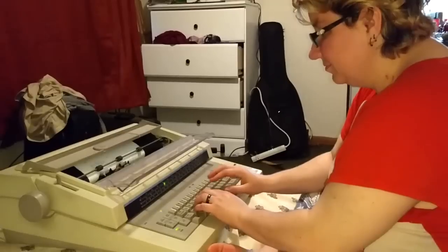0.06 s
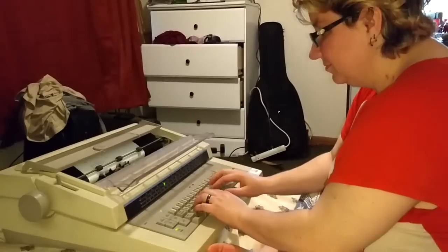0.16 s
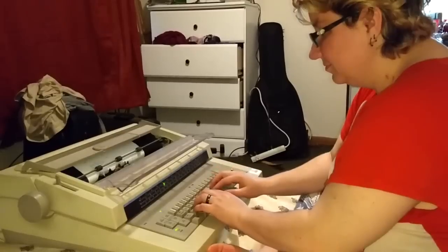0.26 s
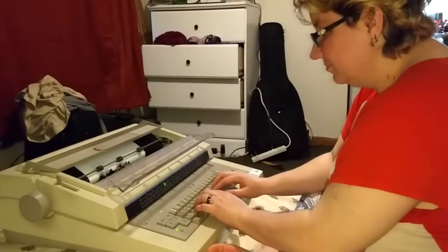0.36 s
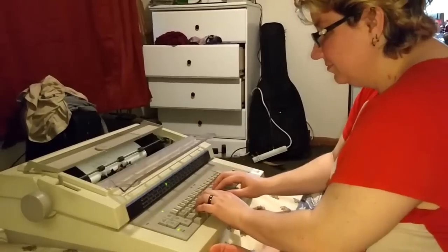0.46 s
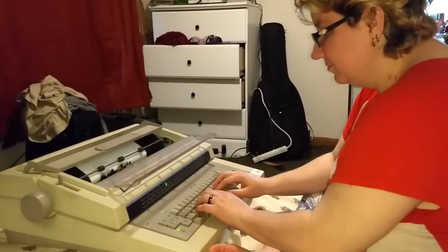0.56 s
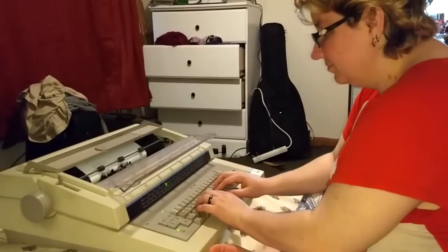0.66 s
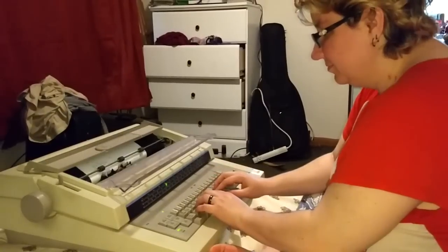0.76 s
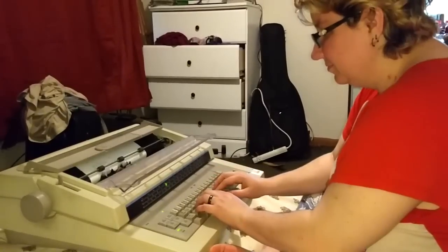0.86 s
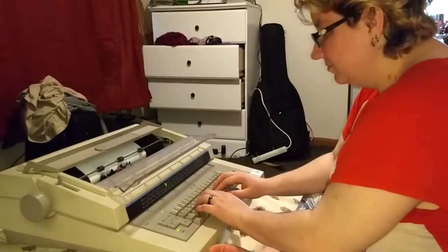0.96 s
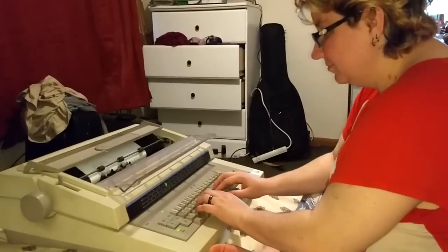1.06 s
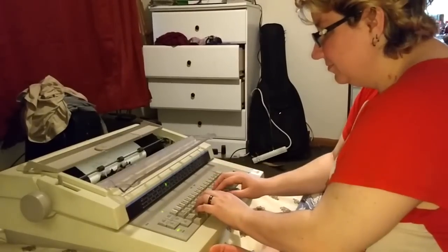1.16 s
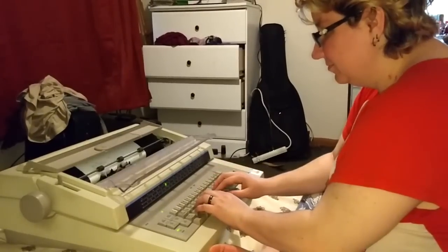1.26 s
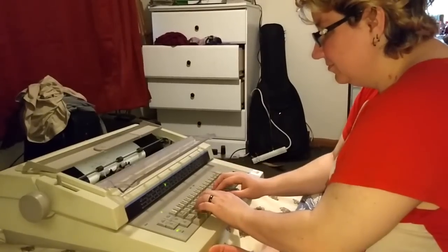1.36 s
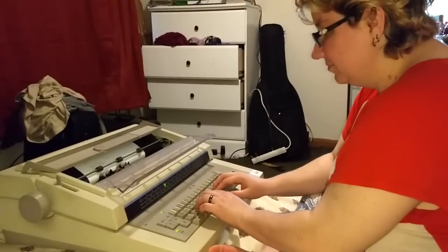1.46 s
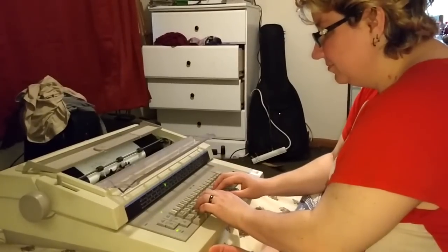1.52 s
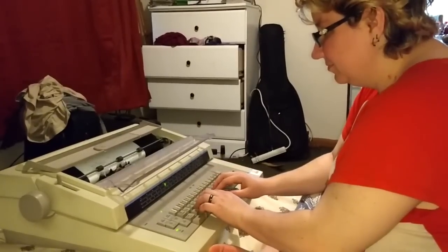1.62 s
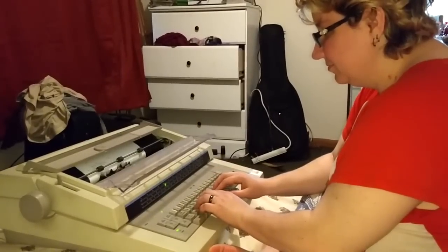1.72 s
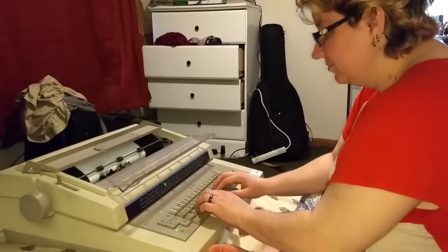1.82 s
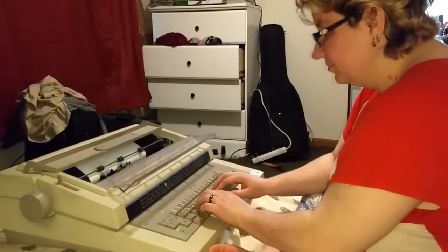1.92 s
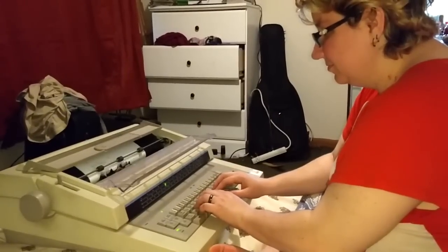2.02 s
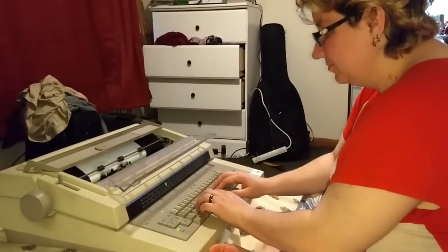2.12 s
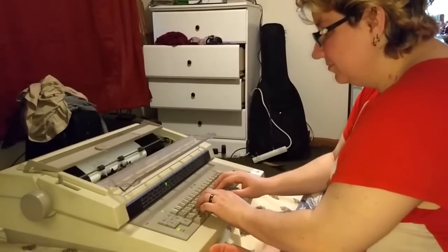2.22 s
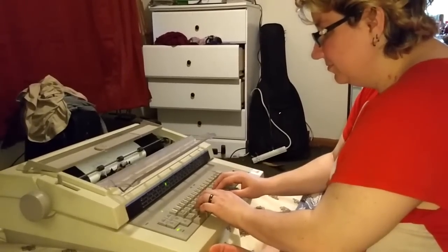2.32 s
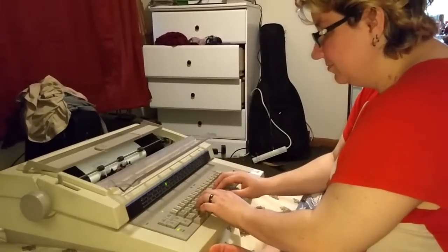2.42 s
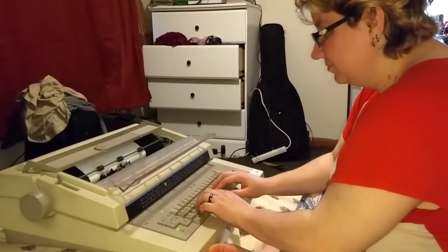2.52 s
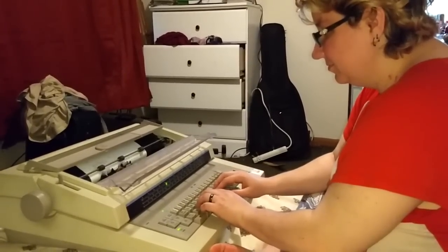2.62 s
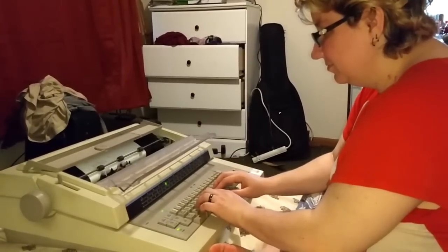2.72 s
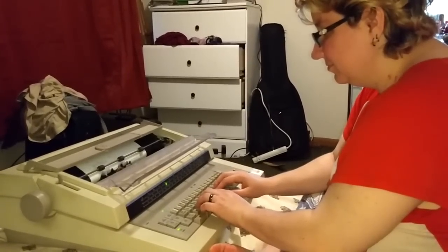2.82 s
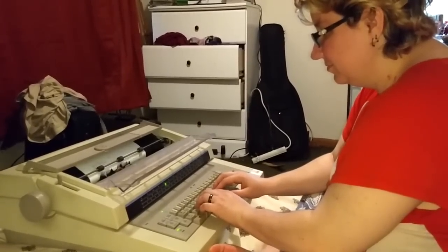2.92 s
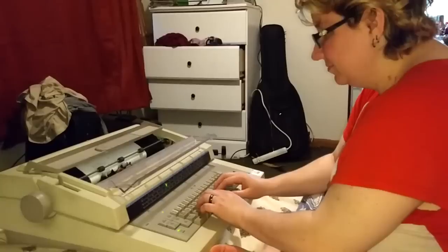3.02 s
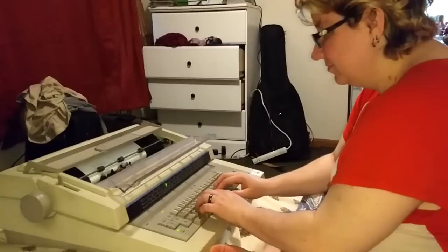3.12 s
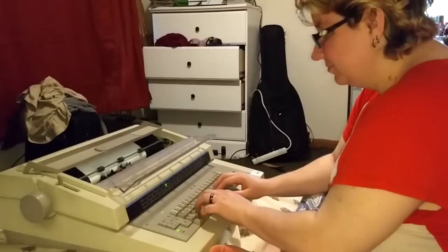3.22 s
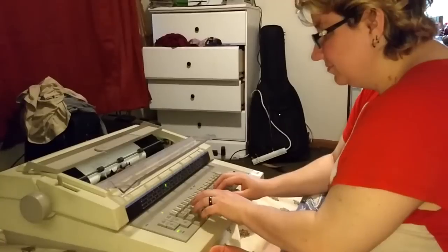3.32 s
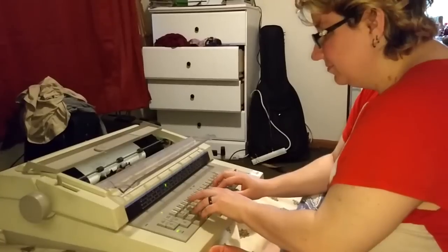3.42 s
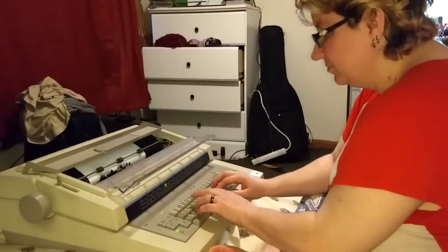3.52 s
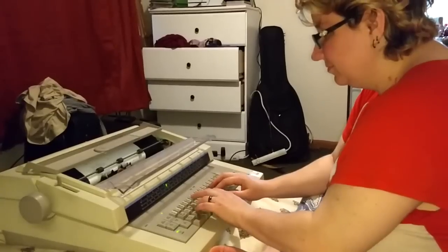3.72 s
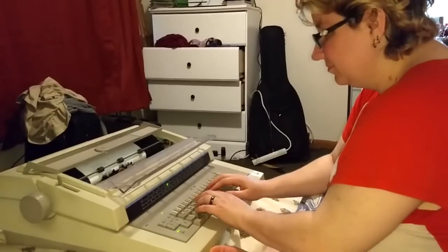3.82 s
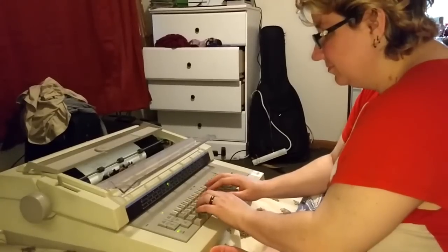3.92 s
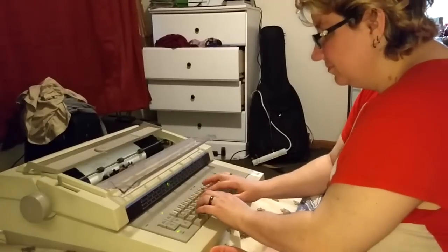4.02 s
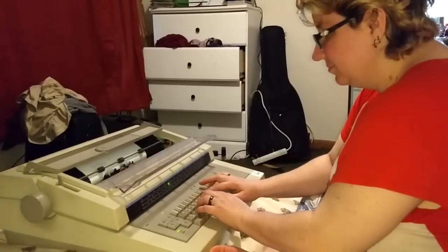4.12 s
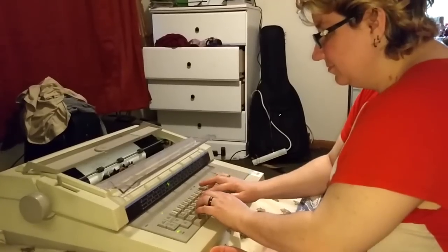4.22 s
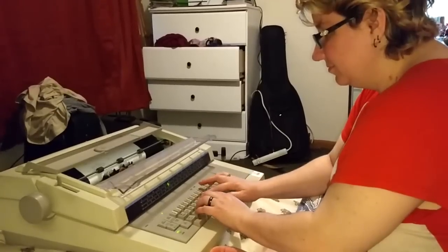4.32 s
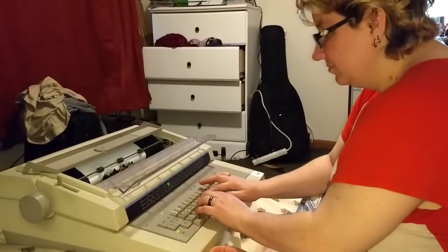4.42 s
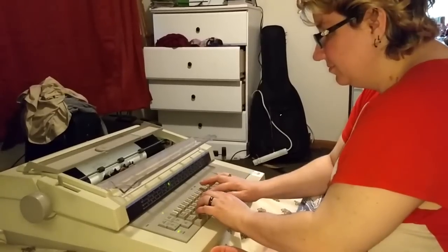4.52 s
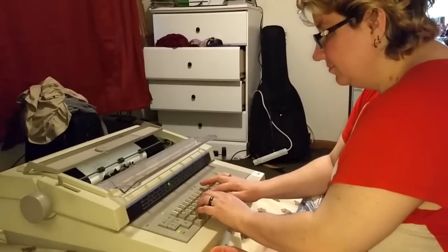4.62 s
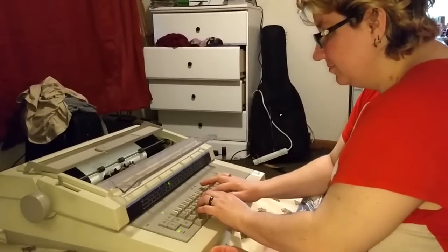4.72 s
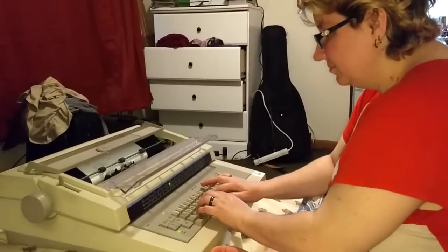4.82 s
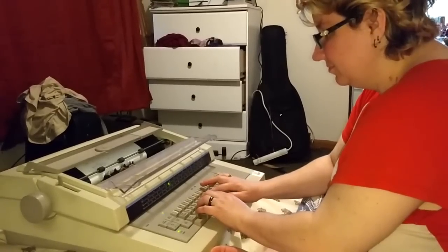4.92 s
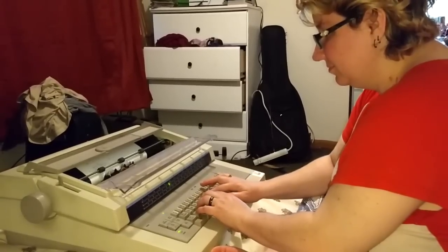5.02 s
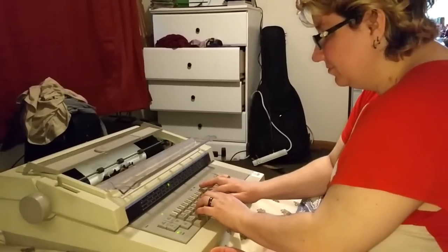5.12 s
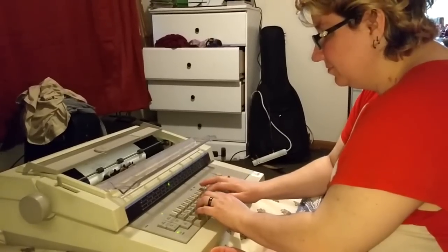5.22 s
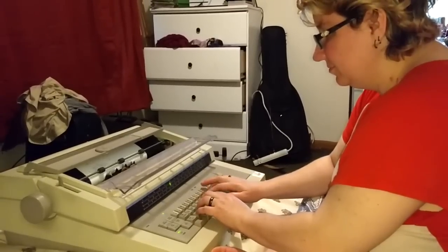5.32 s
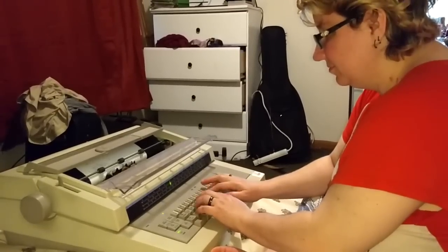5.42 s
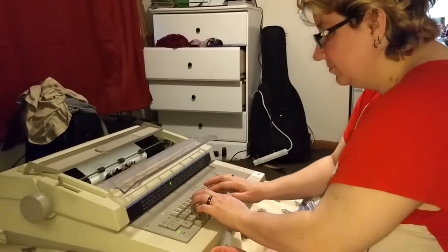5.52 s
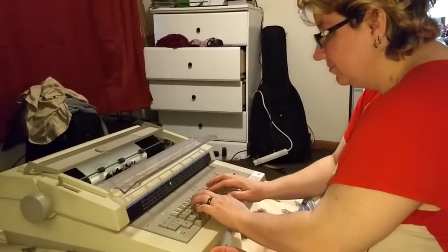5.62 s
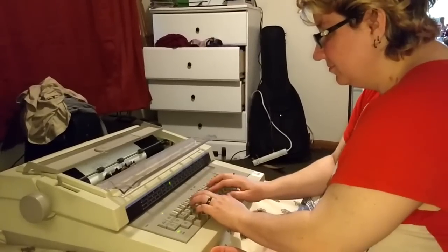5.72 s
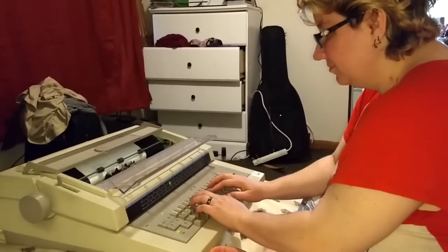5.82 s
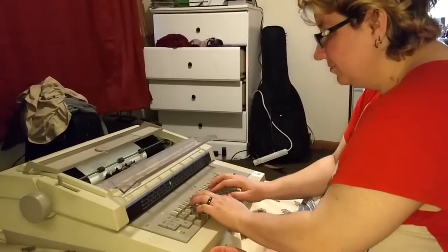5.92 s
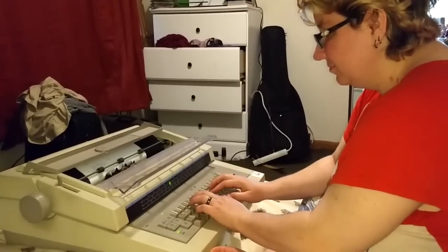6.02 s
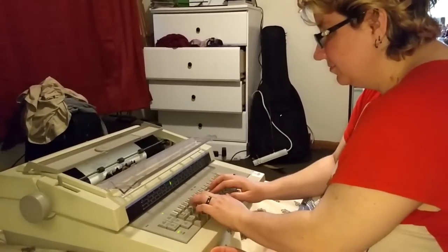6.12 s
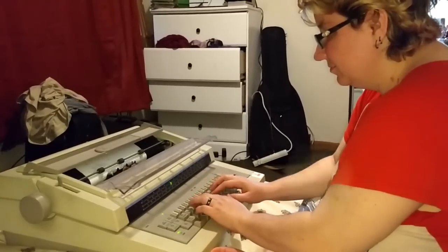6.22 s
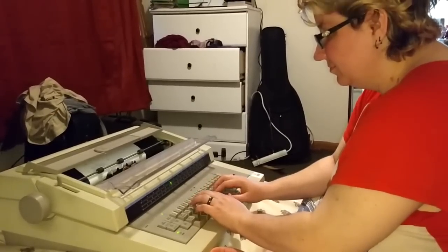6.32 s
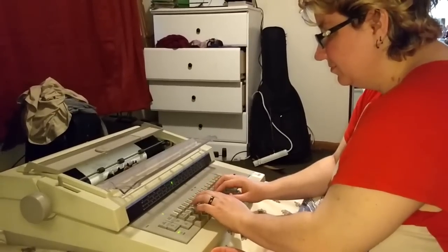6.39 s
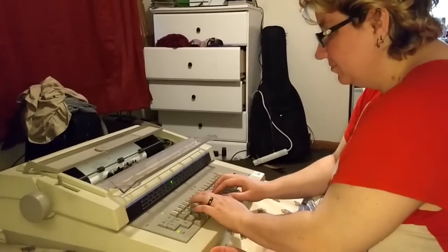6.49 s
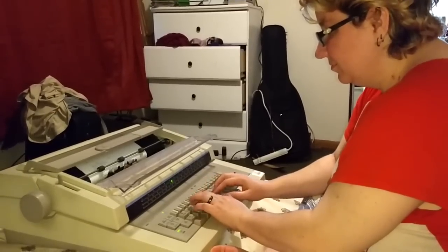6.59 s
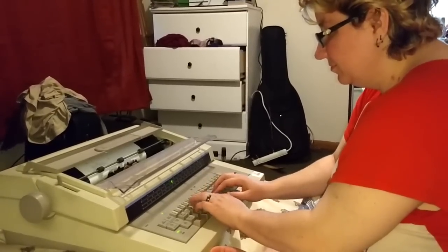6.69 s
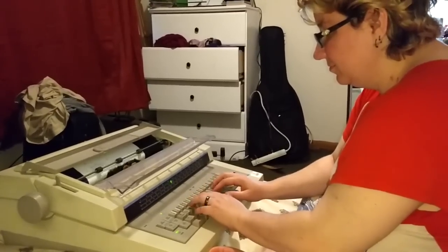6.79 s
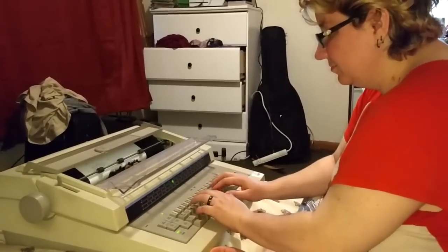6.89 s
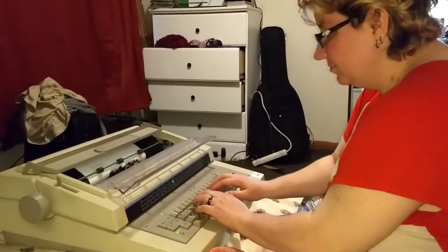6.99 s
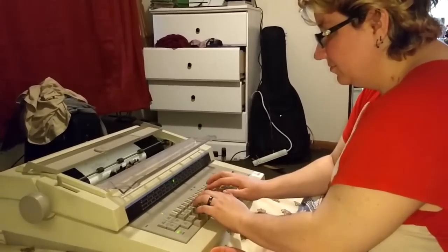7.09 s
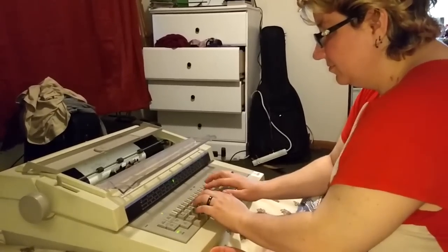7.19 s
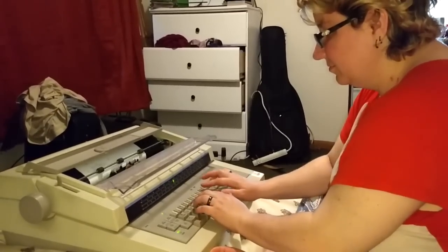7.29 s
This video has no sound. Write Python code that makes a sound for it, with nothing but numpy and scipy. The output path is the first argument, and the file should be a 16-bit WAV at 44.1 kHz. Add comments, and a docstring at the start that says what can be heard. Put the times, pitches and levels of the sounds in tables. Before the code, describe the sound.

An electronic daisywheel typewriter in a small, soft room, heard from about a metre with wide stereo. It opens with one hard strike and a dull knock, then mostly low rumble, faint hum and tiny ticks. After three and a half seconds, strikes come in rapid runs of three or four, each a clack, metallic crack, rattle and plastic thump, with motor whirs and key clicks between.

```python
"""A hard typewriter strike over room rumble, then single key ticks, then bursts of typing.
An electronic daisywheel machine stands on a bed in a small soft room, a metre from a phone with two microphone ports.
Ticks are filtered noise and clicks; stepper motors are shaped noise and tones; a solenoid clacks before each strike,
which cracks, rings the steel, rattles and thumps the plastic case through banks of decaying modes.
Deep rumble, a wavering hum, two sagging drones and microphone hiss lie under it."""
import sys
import numpy as np
from scipy import signal
from scipy.fft import rfft, irfft, next_fast_len
from scipy.io import wavfile
from scipy.ndimage import uniform_filter1d

SR = 44100
rng = np.random.default_rng(int(sys.argv[2]) if len(sys.argv) > 2 else 0)


def volts_from_db(level):
    """Convert decibel levels to linear amplitude ratios."""
    exponent = np.asarray(level, float) / 20
    return 10 ** exponent


def inscribe(sig):
    """Save sig as 16-bit PCM at rate SR to the path in sys.argv[1].

    A 1-D sig is mono; a 2-D sig holds one channel per row.
    Samples are clipped to [-1, 1] before scaling.
    """
    pcm = np.round(np.clip(np.atleast_2d(sig).T, -1, 1) * 32767)
    wavfile.write(sys.argv[1], SR, pcm.astype(np.int16))


N = 324135
SIZE = next_fast_len(N + SR // 2)
HZ = np.maximum(np.arange(SIZE // 2 + 1) * SR / SIZE, 1)
TIME = np.arange(N) / SR
SOLENOID_LEAD_S = 0.021  # solenoid ahead of the strike

# deep rumble and hum, without the strikes: (time [s], rumble [dB], hum [dB])
AIR_LEVELS = [(0.0, -20.5, -26), (1.0, -23, -33.5), (2.2, -29.5, -33.5), (2.55, -25.5, -30),
              (3.2, -29, -31), (4.6, -19.5, -32.5), (5.8, -23, -32.5), (7.35, -20.5, -38)]
# rumble spectrum: (frequency [Hz], level [dB])
RUMBLE_SPECTRUM = [(25, -27.5), (45, 0), (70, -4), (110, -9.5), (160, -13), (400, -22), (1500, -42)]
# hum resonances: (frequency [Hz], width [Hz], level [dB])
HUM_BANDS = [(231, 15, 1), (261, 19, -2), (296.2, 10.6, 5.5)]
# low drones from outside: (start [s], length [s], start pitch [Hz], rest pitch [Hz], level [dB])
DRONES = [(1.15, 0.76, 64.5, 43.7, -44), (4.194, 1.0, 74, 54.95, -35)]
# lone dull knocks on the case: (time [s], level [dB])
KNOCKS = [(0.400, -4), (2.4023, -5), (2.406, -13)]
# stepper motors running: (start [s], length [s], whir [dB], whine [dB])
MOTOR_RUNS = [(-.02, 0.039, -25.5, -43), (0.040, 0.01, -27, -45), (3.439, 0.089, -31.5, -30),
              (3.659, 0.049, -28.5, -27), (4.126, 0.053, -24.5, -22), (5.164, 0.052, -29, -26),
              (6.112, 0.062, -29, -32), (6.394, 0.055, -24.5, -23), (6.66, 0.024, -27, -26)]
# whir spectrum: (frequency [Hz], level [dB])
WHIR_SPECTRUM = [(300, 2.5), (800, -9), (1200, -9.5), (2500, -12), (3100, -14.5), (7000, -17.5),
                 (15000, -44)]
# keys pressed and let go, latches, fingers: (time [s], scuff [dB], centre [Hz], scuff t60 [s], click [dB])
TICKS = [(0.312, -39.5, 1060, 0.15, -29), (0.401, -31.5, 1510, 0.055, -24), (1.304, -37, 1200, 0.03, -22),
         (1.345, -42, 1370, .06, -26), (1.396, -38, 1300, .04, -23), (1.409, -38.5, 3200, 0.08, -18),
         (3.222, -44, 1320, 0.06, -34), (3.3558, -24, 1680, 0.13, -23.5), (3.437, -32.5, 1370, 0.17, -25),
         (3.737, -26, 1140, 0.12, -6), (4.041, -21.5, 3260, 0.05, -13), (4.108, -22.5, 3600, 0.086, -32),
         (4.116, -14, 1990, 0.056, -11), (4.369, -37, 3500, 0.11, -38), (4.378, -42, 5300, 0.06, -20),
         (4.388, -24, 3800, 0.054, -12), (4.474, -45, 5460, 0.18, -40), (5.174, -18.5, 1620, 0.065, -25),
         (5.315, -21, 1790, 0.13, -19), (5.606, -31, 3160, 0.1, -8.5), (5.86, -44.5, 1010, 0.11, -20.5),
         (6.119, -23, 1910, 0.07, -13), (6.519, -35, 3200, 0.2, -17), (6.549, -26.5, 3600, 0.032, -20),
         (6.559, -26, 3380, 0.047, -16), (6.654, -25, 1970, 0.16, -39), (7.045, -26, 1190, 0.15, -27)]
# something drags lightly across the keys: (start [s], length [s], level [dB])
DRAGS = [(4.217, 0.25, -45.5)]
# drag resonances: (frequency [Hz], width [Hz], level [dB])
DRAG_BANDS = [(1360, 2100, -3.5), (2720, 500, 3.5), (4570, 380, -6)]
# small loose parts pinged once: (time [s], level [dB], frequency [Hz], t60 [s])
PINGS = [(1.675, -51.5, 950, 0.037), (2.404, -60, 898, 0.24), (3.3558, -38.5, 1700, 0.026),
         (3.509, -47, 3500, 0.028), (4.0402, -21, 2720, 0.078), (4.117, -26, 1704, 0.045),
         (4.388, -40, 1230, 0.033), (4.476, -51, 6330, 0.088), (5.176, -36, 1930, .04),
         (5.804, -48, 6470, 0.13), (6.1198, -41, 1910, 0.047), (6.655, -25, 1940, 0.036)]
# hammer on platen: (time [s], blow [dB], letter crack [dB], solenoid [dB], carriage step [dB])
STRIKES = [(0.0562, -18, -14, -33, -47), (3.566, -16.5, -11, -18.5, -27), (3.773, -15, -13, -14.5, -25.5),
           (3.884, -16, -10.5, -16.5, -27), (3.97, -15.5, -12.5, -15, -32.5),
           (5.254, -16.5, -12, -16.5, -25), (5.378, -15, -12.5, -13, -22.5),
           (5.473, -16.5, -12.5, -20, -29), (6.206, -18, -18, -12, -25), (6.298, -15.5, -12, -15.5, -24),
           (6.709, -17.5, -21.5, -12, -26.5), (6.797, -15.5, -15.5, -18, -29),
           (6.884, -16, -15.5, -13, -26), (6.992, -19, -16, -17, -25.5), (7.101, -17.5, -17, -14, -26)]
# solenoid clack spectrum: (frequency [Hz], level [dB])
SOLENOID_SPECTRUM = [(400, -5), (800, -19), (1200, -3), (1800, -13.5), (2500, -2.5), (3100, -14),
                     (3800, -6), (5000, -10.5), (7000, -12.5), (15000, -22)]
# spoke and ribbon rattle spectrum: (frequency [Hz], level [dB])
RATTLE_SPECTRUM = [(500, -7), (800, -15.5), (1200, -1.5), (1800, -5.5), (2500, -0.5), (3100, -5),
                   (3800, -8.5), (5000, -6), (7000, -6), (10000, -14), (15000, -17.5)]
# plastic case and platen modes: (frequency [Hz], level [dB], t60 [s], left port lead [ms])
CASE_MODES = [(127.7, -12, 0.16, 0.49), (155.4, 0, 0.084, 0.35), (243, -12.5, 0.065, 0.19),
              (305, -0.5, 0.063, -0.29), (382.5, -7.5, 0.29, 0.13), (531, -9, 0.17, 0.35),
              (733, -15.5, 0.12, 0.19), (962, -12.5, 0.11, -0.17), (1136, -15.5, 0.074, 0.17),
              (1376, -9, 0.082, -0.28), (1535, -6.5, 0.12, -0.22)]
# hammer, spoke and carriage steel modes: (frequency [Hz], level [dB], t60 [s], left port lead [ms])
STEEL_MODES = [(1754, -21, 0.042, 0.26), (2628, -15, 0.024, 0.26), (3397, -18.5, 0.044, 0.27),
               (3500, -16, 0.064, 0.24), (3638, -28.5, 0.14, 0.41), (3808, -12, 0.014, 0.27),
               (4083, -13.5, 0.071, 0.23), (5770, -13.5, 0.014, 0.051), (5890, -14, 0.056, 0.234)]
# letter slapping ribbon, paper and platen: (frequency [Hz], level [dB], t60 [s], left port lead [ms])
SLAP_MODES = [(1250, -12, .012, .2), (2300, -5, .011, .2), (3800, -1, .012, .2), (6300, -11, .007, .2),
              (10500, -14, .004, .2)]
# tip, then root of the letter landing: (lag [s], level [dB])
LETTER_CONTACTS = [(.0003, -3), (.00083, 0)]
# hammer landing and rebounds: (lag [s], steel drive [dB], case drive [dB])
BOUNCES = [(.0003, 0.5, 0), (.0048, -7, 1.5), (.0078, -4, -9), (.017, -51, 6), (.024, -21.5, 4)]
# gain of port difference re port sum: (frequency [Hz], gain [dB])
PORT_SIDE = [(50, -12.5), (125, -15), (250, -13.5), (500, -12), (1000, -6), (2000, 1.5), (4000, 1.3),
             (15000, -1.5)]
# hiss of a port, ahead of the microphone response: (frequency [Hz], level [dB])
HISS_SPECTRUM = [(200, -47), (800, -56), (2500, -60.5), (5000, -63.5), (10000, -71.5), (15500, -70)]
# microphone response: (frequency [Hz], gain [dB])
MIC_RESPONSE = [(15, -30), (32, -12), (48, 0), (15700, 0), (15900, -32), (20000, -50)]


def to_time(spectrum):
    """Waveform of a spectrum, cut to the scene length."""
    return irfft(spectrum, SIZE)[..., :N]


def through(x, response):
    """Filter by a complex frequency response."""
    return to_time(rfft(x, SIZE) * response)


def low_pass(corner_hz):
    """First-order roll-off above the corner."""
    return 1 / (1 + 1j * HZ / corner_hz)


def shape(points):
    """Causal response through (Hz, dB) points, from the cepstrum of the log gain."""
    hz, db = np.transpose(points)
    log_gain = np.interp(np.log(HZ), np.log(hz), db) * np.log(10) / 20
    cepstrum = irfft(log_gain, SIZE)
    cepstrum[1:SIZE // 2] *= 2
    cepstrum[SIZE // 2 + 1:] = 0
    return np.exp(rfft(cepstrum))


def ring(hz, width_hz):
    """One resonance, gain 1 at its centre."""
    return 1 / (1 + 1j * (HZ / hz - hz / HZ) * hz / width_hz)


def bands(table):
    """A few resonances side by side, alternating in sign."""
    return sum((-1) ** k * volts_from_db(db) * ring(hz, width) for k, (hz, width, db) in enumerate(table))


def modes(table, drive=None):
    """Response at both ports of decaying sines, each from its own side of the machine."""
    out = 0
    for k, (hz, db, t60, lead_ms) in enumerate(table):
        width_hz = np.log(1000) / np.pi / t60
        lead = np.exp(1j * np.pi * HZ * lead_ms / 1000 * np.array([[1], [-1]]))
        # scaled so that an impulse starts each sine at its level
        mode = (-1) ** k * volts_from_db(db) * ring(hz, width_hz) * SR / (2 * np.pi * width_hz) * lead
        out = out + mode * (1 if drive is None else drive[k])
    return out


def grit(scatter_db):
    """Two unrelated streams of tiny contacts of uneven size, rms 1."""
    size_db = scatter_db * uniform_filter1d(rng.standard_normal(N), size=40) * 40 ** .5
    x = rng.standard_normal((2, N)) * volts_from_db(size_db)
    return x / x.std()


def blows(times, db, rise_s, t60_s):
    """Envelope of blows that rise and die away exponentially."""
    t = np.maximum(TIME - np.reshape(times, (-1, 1)), 0)
    return volts_from_db(db) @ ((1 - np.exp(-t / rise_s)) * 1000 ** (-t / t60_s))


def spans(times, lengths, db, edge_s):
    """Envelope that is on for a while, with soft edges."""
    t = TIME - np.reshape(times, (-1, 1))
    rise = np.clip(t / edge_s, 0, 1)
    fall = np.clip((np.reshape(lengths, (-1, 1)) - t) / edge_s + 1, 0, 1)
    return volts_from_db(db) @ (rise * fall)


def taps(times, db):
    """Spectrum of single-sample impulses."""
    return volts_from_db(db) @ np.exp(-2j * np.pi * HZ * np.reshape(times, (-1, 1)))


def air():
    """Deep rumble and a wavering hum a little above it; both swell when a strike shakes the bed."""
    boom_db, hum_swell_db = -10.5, -5  # re blow
    waver_db, waver_s = 5, 0.3
    strike_s, blow_db, *_ = np.transpose(STRIKES)
    shake = blows(strike_s, blow_db, rise_s=0.0082, t60_s=0.6)
    at_s, rumble_db, hum_db = np.transpose(AIR_LEVELS)
    span = int(waver_s * SR)
    waver = uniform_filter1d(uniform_filter1d(rng.standard_normal(N), span), span)
    rumble_level = volts_from_db(np.interp(TIME, at_s, rumble_db)) + volts_from_db(boom_db) * shake
    hum_level = volts_from_db(np.interp(TIME, at_s, hum_db) + waver_db * waver / waver.std())
    hum_level = hum_level + volts_from_db(hum_swell_db) * shake
    rumble = through(grit(0.32), shape(RUMBLE_SPECTRUM)) * rumble_level
    hum = through(grit(0.52), bands(HUM_BANDS) * ring(246, 170)) * hum_level
    return rumble + hum


def drone():
    """Low tones that fall quickly, settle and fade a little."""
    sag_s, edge_s, fade_db_per_s = 0.148, 0.049, -6.5
    port_phase_rad = np.array([[0], [1.3]])
    out = 0
    for start_s, length_s, start_hz, rest_hz, db in DRONES:
        t = np.maximum(TIME - start_s, 0)
        hz = rest_hz + (start_hz - rest_hz) * np.exp(-t / sag_s)
        level = spans([start_s], [length_s], [db], edge_s) * volts_from_db(fade_db_per_s * t)
        out = out + level * np.sin(2 * np.pi * np.cumsum(hz) / SR + port_phase_rad)
    return out


def knocks():
    """Dull clicks close to the phone: impulses through one broad resonance, dry, with no room tail."""
    return to_time(taps(*np.transpose(KNOCKS)) * ring(325, 580) * low_pass(2200) ** 2)


def motors():
    """Steppers whir, whine, shake the case and stop with a thud; the carriage also steps after each strike."""
    step_lag_s, step_s = 0.016, 0.062
    step_hz, tone_db, thud_db = 169.3, -9.5, -13  # levels re whir
    coast_t60_s, case_shake_db = 0.102, -37
    whine_hz, whine_width_hz = 11520, 290
    start_s, length_s, db, whine_db = np.transpose(MOTOR_RUNS)
    stop_s = start_s + length_s
    strike_s, *_, step_db = np.transpose(STRIKES)
    running = spans(start_s, length_s, db, 0.0096) + blows(stop_s, db, 0.017, coast_t60_s)
    running = running + spans(strike_s + step_lag_s, step_s + 0 * strike_s, step_db, 0.012)
    whine_level = spans(start_s, length_s, whine_db, 0.0095) * blows(start_s, 0 * start_s, 0.016, 0.21)
    whine = through(grit(0.87) * whine_level, ring(whine_hz, whine_width_hz))
    shaken = modes(CASE_MODES)[0] * low_pass(450) ** 2
    whir = through(grit(1.35) * running, shape(WHIR_SPECTRUM) + volts_from_db(case_shake_db) * shaken)
    thud = to_time(taps(stop_s, db + thud_db) * shaken)
    tone = spans(start_s, length_s - .01, db + tone_db, 0.018) * np.sin(2 * np.pi * step_hz * TIME)
    return whir + whine + thud + tone


def keys():
    """Each tick is a broad click and a narrower noise scuff around one centre; a drag is resonant noise."""
    out, noise = 0, grit(3.6)
    for at_s, db, hz, t60_s, click_db in TICKS:
        scuff = rfft(noise * blows([at_s], [db], 0.00063, t60_s), SIZE) * ring(hz, 0.79 * hz) ** 2
        click = taps([at_s], [click_db]) * ring(hz, 1.85 * hz) * low_pass(5000) ** 2
        out = out + scuff + click
    drag = through(grit(2.2) * spans(*np.transpose(DRAGS), .02), bands(DRAG_BANDS))
    return to_time(out) + drag


def pings():
    """Small loose parts: one decaying sine each."""
    return to_time(sum(taps([at_s], [0]) * modes([(hz, db, t60, .2)]) for at_s, db, hz, t60 in PINGS))


def solenoid_clack():
    """Solenoid throwing the hammer: shaped noise bursts ahead of the strikes."""
    strike_s, _, _, db, _ = np.transpose(STRIKES)
    clack = grit(2.6) * blows(strike_s - SOLENOID_LEAD_S, db, 0.0018, 0.14)
    return through(clack, shape(SOLENOID_SPECTRUM))


def plunger():
    """Solenoid plunger: a decaying sine just after each clack starts."""
    strike_s, _, _, db, _ = np.transpose(STRIKES)
    return to_time(taps(strike_s - SOLENOID_LEAD_S + 0.001055, db) * modes([(6010, -10.5, 0.037, .1)]))


def rattle():
    """After a blow spokes and ribbon rattle as noise, and random spoke knocks ring the steel."""
    rattle_db, chatter_db = 8, -8.5  # re blow
    rise_s, knocks_per_s = .006, 500
    strike_s, db, *_ = np.transpose(STRIKES)
    noise = grit(4.3) * blows(strike_s, db + rattle_db, rise_s, 0.12)
    knocking = (rng.random(N) < knocks_per_s / SR) * rng.standard_normal((2, N))
    knocking = knocking * blows(strike_s, db + chatter_db, rise_s, 0.088)
    return through(noise, shape(RATTLE_SPECTRUM)) + through(knocking, modes(STEEL_MODES)[0])


def letter_scatter_db(table):
    """Each letter drives each mode differently: random dB, modes by strikes."""
    return 2.5 * rng.standard_normal((len(table), len(STRIKES)))


def case():
    """Strikes, ticks and knocks push the case modes; roll-offs make the push soft and long."""
    thump_db, tick_nudge_db, knock_nudge_db = -21, -20.5, -36  # re blow, scuff, knock
    strike_s, blow_db, *_ = np.transpose(STRIKES)
    tick_s, tick_db, *_ = np.transpose(TICKS)
    knock_s, knock_db = np.transpose(KNOCKS)
    lag_s, _, bounce_db = np.transpose(BOUNCES)
    push = taps(strike_s, blow_db + thump_db + letter_scatter_db(CASE_MODES)) * taps(lag_s, bounce_db)
    push = push + taps(tick_s, tick_db + tick_nudge_db)
    push = push + taps(knock_s, knock_db + knock_nudge_db) * low_pass(400) ** 2
    return to_time(modes(CASE_MODES, push * low_pass(1500)))


def strike():
    """The letter slaps ribbon, paper and platen in two contacts; the hammer bounces and rings the steel."""
    steel_db = 0.5  # re crack
    strike_s, _, crack_db, *_ = np.transpose(STRIKES)
    lag_s, bounce_db, _ = np.transpose(BOUNCES)
    slap = taps(strike_s, crack_db) * taps(*np.transpose(LETTER_CONTACTS)) * modes(SLAP_MODES)
    drive = taps(strike_s, crack_db + steel_db + letter_scatter_db(STEEL_MODES))
    steel = taps(lag_s, bounce_db) * modes(STEEL_MODES, drive)
    return to_time(slap + steel)


def room(x):
    """Soft room: decaying noise, unrelated in the two channels, dulled in the treble."""
    t60_s, level_db = 0.21, -6.5
    tail = rng.standard_normal((2, SR // 2)) * 1000 ** (-TIME[:SR // 2] / t60_s)
    tail = tail / np.linalg.norm(tail, axis=1, keepdims=True)
    return through(x, volts_from_db(level_db) * rfft(tail, SIZE) * low_pass(6000))


def scene():
    """What reaches the two ports: diffuse sound is alike in the bass, unrelated in the treble."""
    loose = motors() + keys() + solenoid_clack() + rattle()
    rung = pings() + plunger() + case() + strike()
    both, apart = air() + drone() + knocks() + loose + room(loose + rung)
    apart = through(apart, shape(PORT_SIDE))
    return rung + np.array([both + apart, both - apart]) / 2 ** .5


def top_cut(x):
    """Nothing passes above the cut-off."""
    return signal.sosfilt(signal.butter(12, 17120, fs=SR, output="sos"), x)


def record(dry):
    """Each port hisses; the phone widens the image by taking a delayed copy of each port off the other."""
    cross_lag_s, cross_gain, cross_top_hz = 0.000427, 0.69, 8740
    hiss = through(rng.standard_normal((2, N)), shape(HISS_SPECTRUM))
    hiss[1] = through(hiss[1], 1 + 1j * HZ / 9000)  # right port hisses brighter
    ports = dry + hiss
    cross = cross_gain * np.exp(-2j * np.pi * HZ * cross_lag_s) / np.sqrt(1 + (HZ / cross_top_hz) ** 2)
    widened = ports - through(ports[::-1], cross)
    mix = through(widened, shape(MIC_RESPONSE))
    return top_cut(mix)


dry = scene()
out = record(dry)
inscribe(out)
```